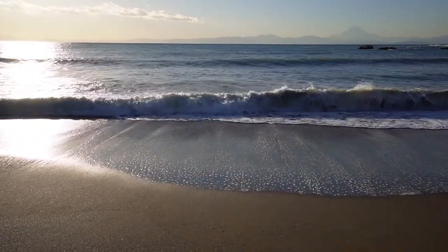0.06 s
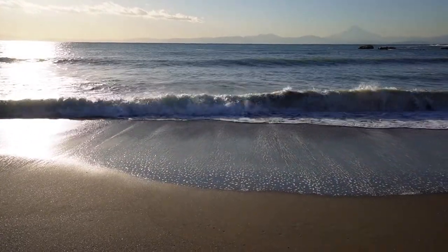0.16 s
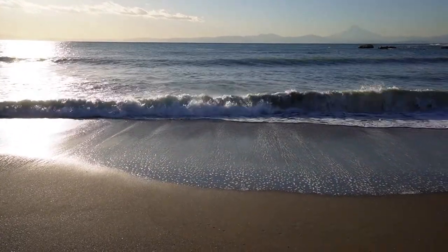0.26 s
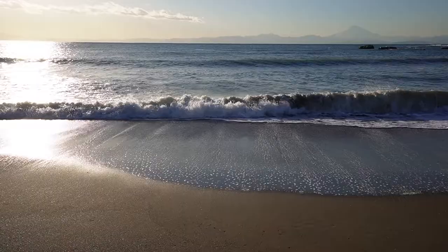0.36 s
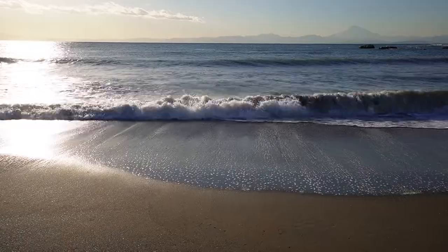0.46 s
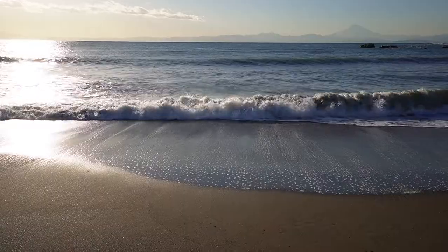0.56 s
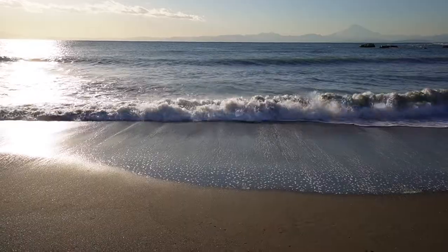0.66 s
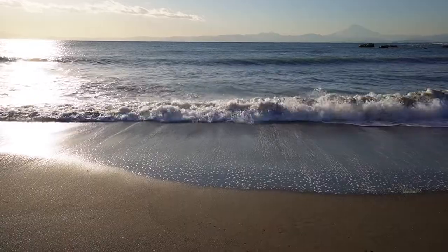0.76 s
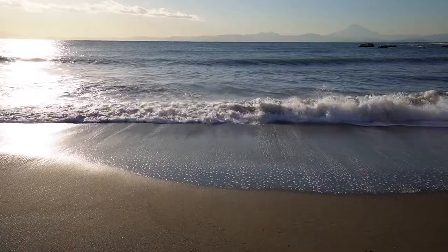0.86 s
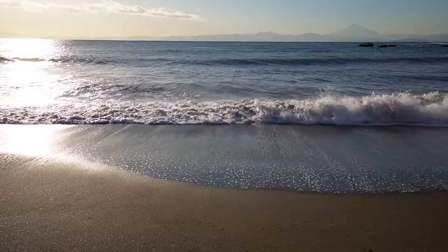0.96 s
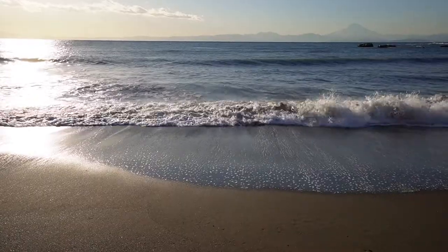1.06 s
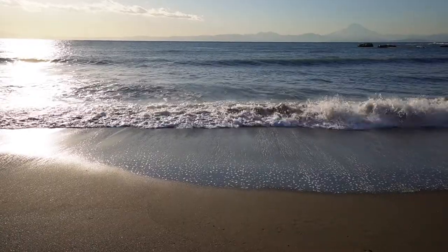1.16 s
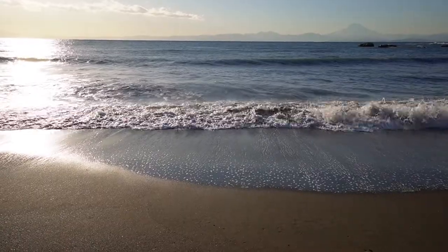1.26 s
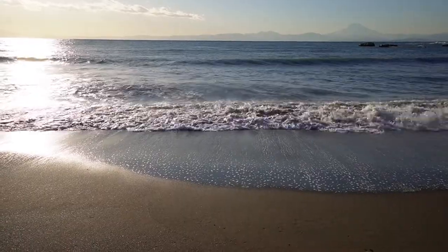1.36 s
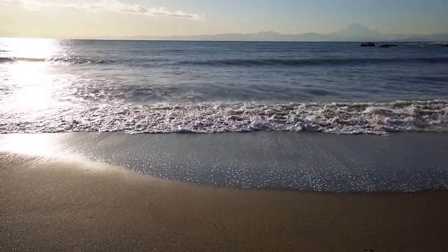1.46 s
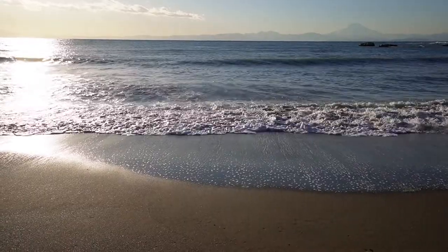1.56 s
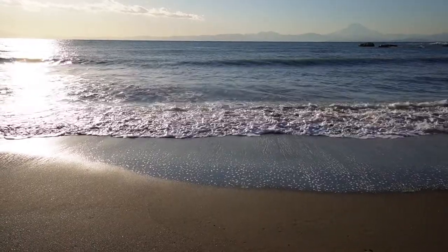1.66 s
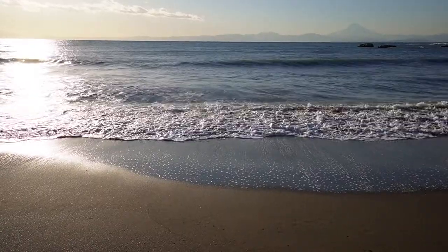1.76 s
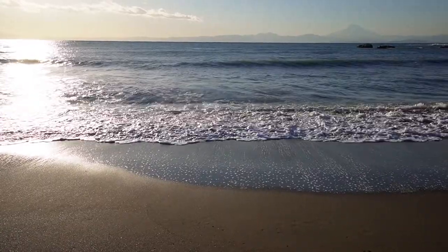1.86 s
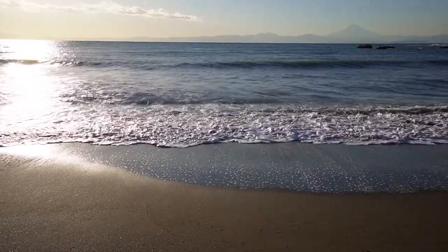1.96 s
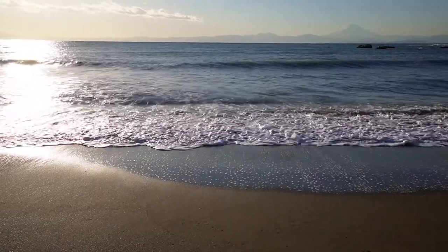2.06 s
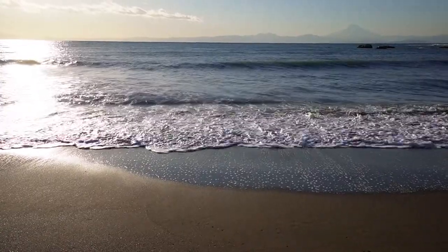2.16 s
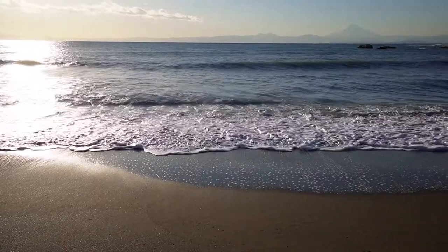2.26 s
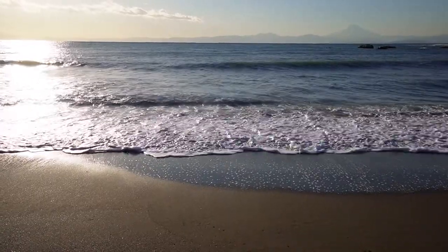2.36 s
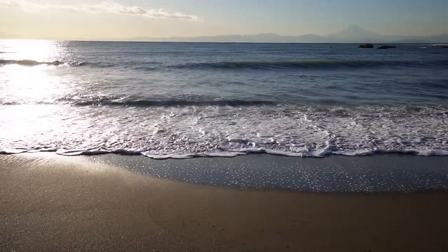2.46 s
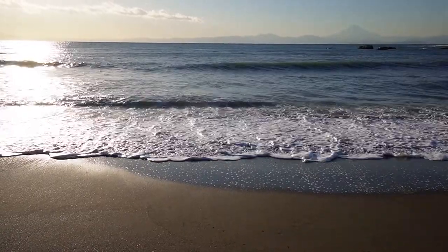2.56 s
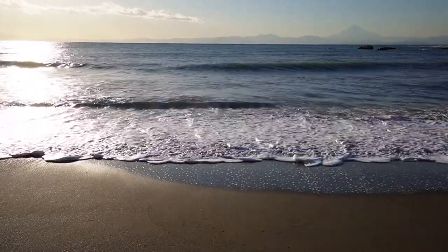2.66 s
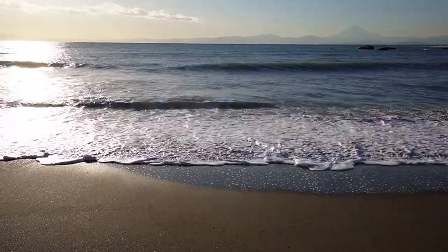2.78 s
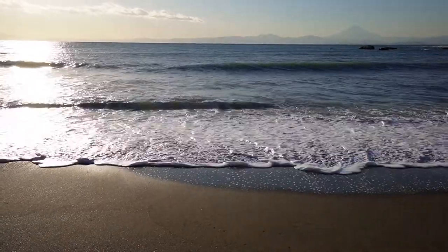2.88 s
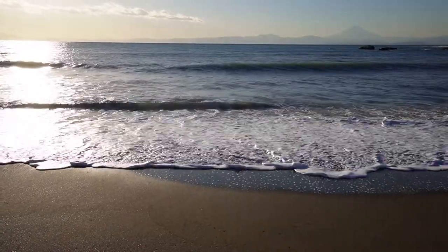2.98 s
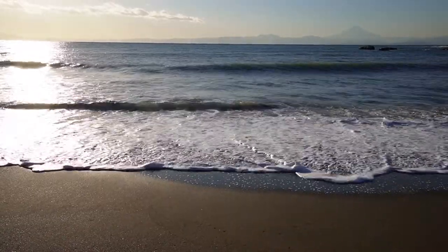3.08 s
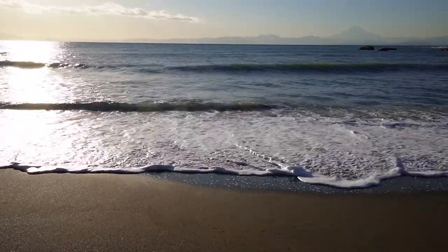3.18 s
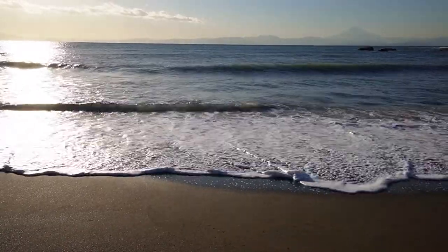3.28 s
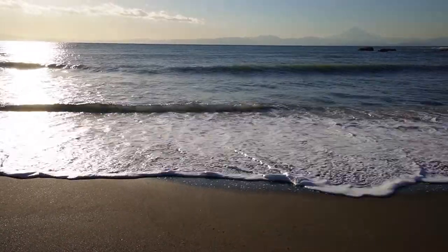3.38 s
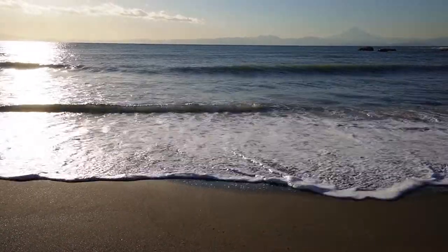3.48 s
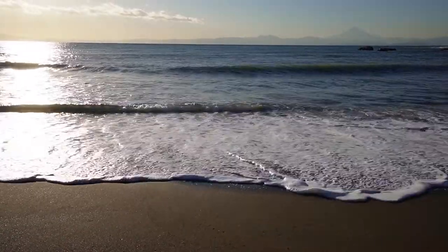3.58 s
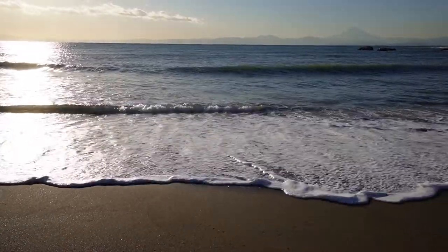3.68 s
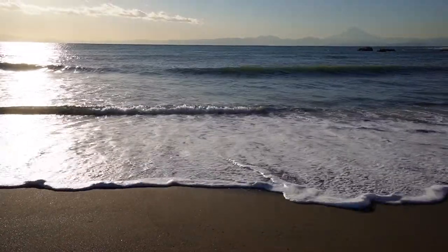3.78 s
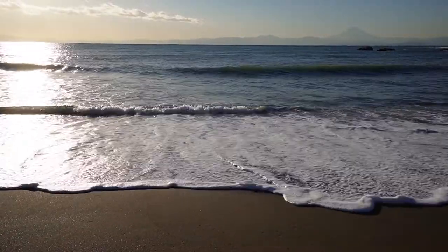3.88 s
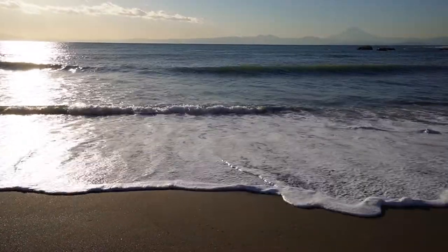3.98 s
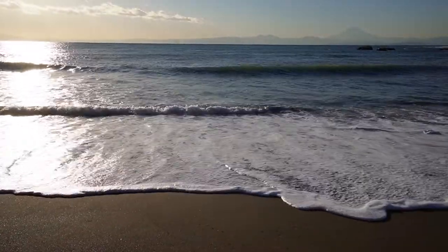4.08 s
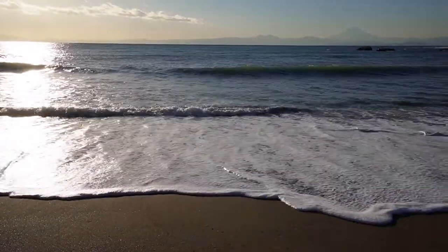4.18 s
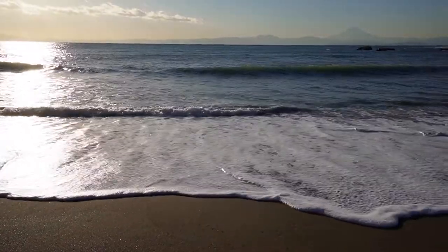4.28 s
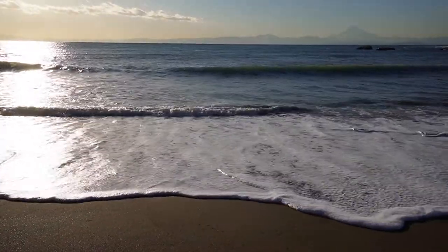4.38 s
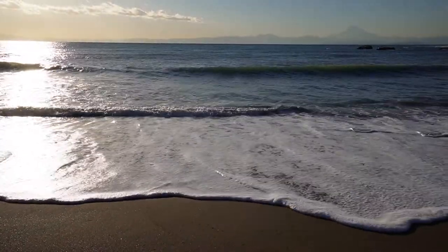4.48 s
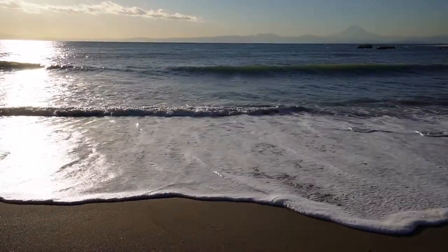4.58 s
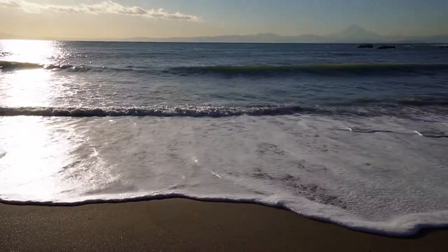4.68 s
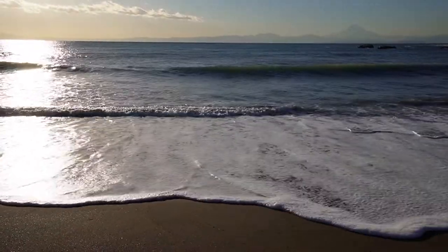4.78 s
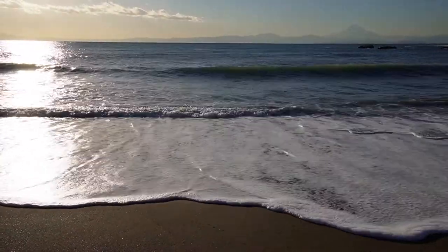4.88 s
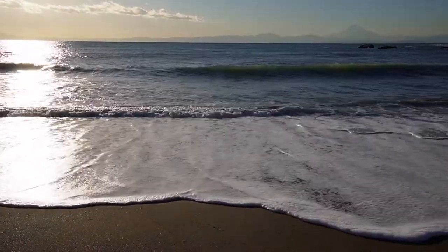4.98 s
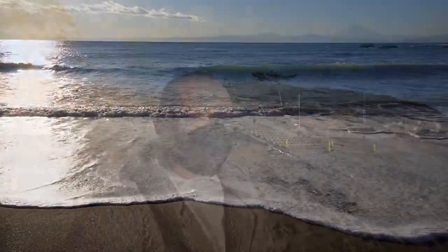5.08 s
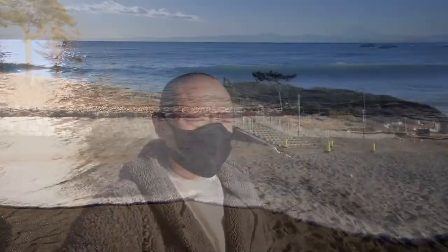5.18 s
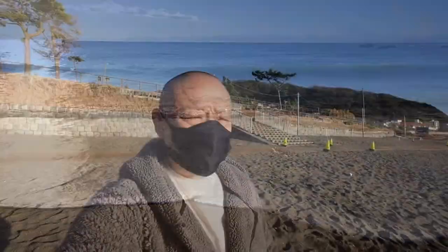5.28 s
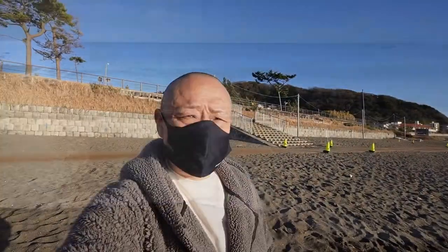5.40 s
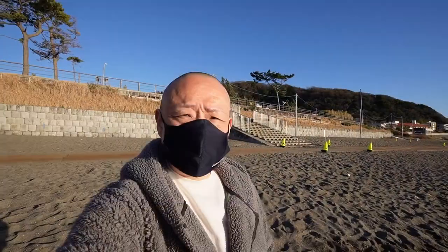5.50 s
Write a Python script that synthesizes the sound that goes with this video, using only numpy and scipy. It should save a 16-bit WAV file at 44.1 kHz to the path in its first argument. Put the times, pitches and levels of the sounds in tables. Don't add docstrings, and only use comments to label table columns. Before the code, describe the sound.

A large wave breaks loudly on a sandy beach, fades into hissing foam, then a smaller wave breaks and washes in.

```python
import sys
import numpy as np
from scipy import signal
from scipy.fft import rfft, irfft, next_fast_len
from scipy.io import wavfile
from scipy.ndimage import uniform_filter1d, map_coordinates

SR = 44100
rng = np.random.default_rng(int(sys.argv[2]) if len(sys.argv) > 2 else 0)


def linear_from_db(decibels):
    return 10 ** (np.asarray(decibels, float) / 20)


def inscribe(sig):
    pcm = np.round(np.clip(np.atleast_2d(sig).T, -1, 1) * 32767)
    wavfile.write(sys.argv[1], SR, pcm.astype(np.int16))


N = 244314
T = np.arange(N) / SR


def unit(x):
    return x / np.sqrt(np.mean(x ** 2) + 1e-20)


def along(points, hz):
    f, value = np.transpose(points)
    return np.interp(np.log(hz + 1), np.log(f + 1), value)


def curves(rows):
    s, *columns = np.transpose(rows)
    return [np.interp(T, s, column) for column in columns]


def wobble(rate):
    return map_coordinates(rng.standard_normal(400), [T * rate])


def lifts(rows):
    total_db = np.zeros(N)
    for s, db, length in rows:
        u = np.clip((T - s) / length + 1, 0, None)
        total_db += db * u * np.exp(1 - u)
    return total_db


def joined(*levels_db):
    return np.sqrt(sum(linear_from_db(2 * db) for db in levels_db))


def filtered(x, response):
    m = next_fast_len(N + 8192)
    return irfft(rfft(x, m) * response(np.fft.rfftfreq(m, 1 / SR)), m)[..., :N]


def rush(spectrum, patchy_db):
    z = signal.stft(rng.standard_normal((2, N)), nperseg=512)[2]
    field = uniform_filter1d(rng.standard_normal(z.shape[1:]), size=8, axis=0)
    field = uniform_filter1d(field, size=12, axis=1)
    pair = signal.istft(z * linear_from_db(patchy_db * unit(field)), nperseg=512)[1][:, :N]
    return unit(filtered(pair, lambda hz: linear_from_db(along(spectrum, hz))))


def bubbles(count, size, centre_hz, spread, cycles, uneven_db):
    draw = rng.random((count, 2))
    hz = centre_hz * np.exp(spread * rng.standard_normal((count, 1)))
    turns = np.clip(hz, 200, 14000) * np.arange(size) / SR
    ring = np.sin(2 * np.pi * turns * (1 + 0.17 * turns / cycles))
    ring *= linear_from_db(-60 * turns / cycles) * (1 - np.exp(-turns))
    rarity = np.minimum(-np.log(draw[:, 1:2]), 3.5)
    ring *= linear_from_db(uneven_db * rarity)
    where = (draw[:, :1] * 2 * N).astype(int) + np.arange(size)
    swarm = np.bincount(where.ravel(), ring.ravel(), 2 * N + size)
    return unit(swarm[:2 * N].reshape(2, N))


# t/s, force level/dB, whiteness/0 plunging crest - 1 tumbling bore, small bubbles/share 0-1
BREAKING_WATER = [(0, -17, -0.14, 0.1), (.14, -16, .05, 0.46), (.35, -15, -0.064, 0.1),
                  (.62, -15.5, 0.21, .23), (.87, -17, 0.19, 0.4), (1.0, -20, 0.93, 0.6),
                  (1.48, -21, 0.86, 0.43), (1.62, -24.5, 0.91, 0.26), (2.05, -32, 1, 0.4),
                  (2.35, -35, 0.25, 0.5), (3.05, -37.5, 0.5, 0.76), (3.44, -35.5, 0.27, 0.7),
                  (3.52, -32, -0.16, 0.94), (3.87, -27, 0.016, 0.32), (4.12, -25.5, -0.11, 0.62),
                  (4.62, -26.5, -0.24, 0.38), (4.9, -26, -0.19, .6), (5.25, -26.5, .1, .4)]


def breaking_water():
    force_db, white, small = curves(BREAKING_WATER)
    return force_db, white, np.clip(small, 0, 1)


# t/s, lift level/dB, length/s
SLAPS = [(0.147, 0.5, 0.049), (.61, 0, 0.017), (1.2, 1, .02), (1.37, 1.5, .05), (1.464, 3, 0.01),
         (3.472, 2.5, 0.016), (3.53, 2.5, .03), (3.6, 1.5, 0.022), (3.72, 3, 0.025), (3.87, 1, .06),
         (4.75, 1.5, 0.016), (5.05, 1, 0.087), (5.2, 2, 0.049), (5.268, 2, 0.023)]


def slaps():
    return lifts(SLAPS)


# f/Hz, level/dB per Hz
LARGE_BUBBLES = [(150, -50), (350, -7), (550, -4), (700, -2), (900, -3), (1150, -6.5), (1800, -14),
                 (2300, -14.5), (4000, -51)]
# f/Hz, level/dB per Hz
SMALL_BUBBLES = [(300, -19), (700, -5.5), (1100, 0), (1500, 1), (1800, 0.5), (2050, -13.5), (2800, -10),
                 (5000, -50)]


def crest_churn(force_db, small, surge, slap_db, out_db, in_db):
    next_db = -34
    gurgle = bubbles(count=9000, size=400, centre_hz=1213, spread=0.362, cycles=16.6, uneven_db=3.5)
    roar = np.sqrt(1 - small) * rush(LARGE_BUBBLES, patchy_db=0.44)
    roar = roar + np.sqrt(small) * rush(SMALL_BUBBLES, patchy_db=0.86)
    gain = joined(force_db + out_db, next_db + in_db) * linear_from_db(0.25 * surge + 0.23 * slap_db)
    compact = linear_from_db([[0], [-2.5]])
    return compact * gain * (roar + linear_from_db(-8) * gurgle)


# f/Hz, level/dB per Hz
AIR_CLOUDS = [(22, -34), (50, -16.5), (100, -7.5), (200, -0.5), (300, -3), (450, -8.5), (800, -22),
              (1500, -58)]
# t/s, lift level/dB
THUDS = [(.2, 1.5), (.76, 5), (.89, 4), (1.03, 1.5), (1.2, 3), (1.32, 2.5), (1.88, 0.5), (2.02, 1.5),
         (2.13, 2), (2.82, 3.5), (3.93, 1), (4.37, 5), (4.54, 3.5), (4.77, -1), (5.0, 0)]


def air_boom(force_db, white, out_db):
    boom_db, white_db, thud_s = -3, 6, 0.03
    thud_db = lifts([(s, db, thud_s) for s, db in THUDS])
    gain = linear_from_db(force_db + boom_db + white_db * white + thud_db + out_db)
    return gain * linear_from_db(0.84 * wobble(12)) * rush(AIR_CLOUDS, patchy_db=-0.3)


# f/Hz, level/dB per Hz
FOAM = [(300, -27), (700, -10.5), (1500, -11), (2000, -2.5), (2900, -2.5), (4200, -5), (6000, -11.5),
        (8500, -25), (13000, -52)]


def foam_fizz(force_db, white, surge, slap_db, out_db, drain_db):
    foam_db, white_db, sheet_db = -4.5, 5.5, -35
    fizz = bubbles(count=30000, size=100, centre_hz=3210, spread=0.28, cycles=7.3, uneven_db=2.5)
    gain = joined(force_db + foam_db + white_db * white + out_db, sheet_db + drain_db)
    return gain * linear_from_db(0.85 * surge + slap_db) * (rush(FOAM, patchy_db=0.14) + linear_from_db(-9.5) * fizz)


# f/Hz, level/dB per Hz
SPRAY = [(3500, -42), (6000, 0), (8000, -2), (10500, -8), (13000, -16.5), (15700, -28)]
# t/s, spray lift level/dB, length/s
MEETING = (3.86, 4.6, .22)


def spray_hiss(force_db, white, surge, slap_db, out_db, in_db, drain_db):
    spray_db, white_db, spray_grows, full_db = -35, 6, 1.27, -16
    sheet_db, spray_drains = -46.3, 1.4
    next_db, next_dims = -44, 0.3
    thrown_db = spray_db + spray_grows * (force_db - full_db) + white_db * white + out_db
    sheet_db = sheet_db + lifts([MEETING]) + spray_drains * drain_db
    gain = joined(thrown_db, sheet_db, next_db + in_db + next_dims * out_db)
    gain = gain * linear_from_db(1.8 * surge + 0.6 * slap_db + 0.49 * wobble(4.6))
    return gain * rush(SPRAY, patchy_db=-1.1)


# f/Hz, level/dB per Hz
FAR = [(25, -9), (60, -12), (130, 10.5), (220, -16), (350, -3), (500, -14), (900, -10), (2500, -11.5),
       (6000, -40)]


def distant_surf(since_fade_s):
    level = linear_from_db([[-42], [-39]] + 1.2 * wobble(3))
    return level * linear_from_db(-15 * since_fade_s) * rush(FAR, patchy_db=-0.5)


def surf():
    force_db, white, small = breaking_water()
    slap_db = slaps()
    surge = 0.39 * wobble(9.8) + 0.18 * wobble(14)
    since_fade_s = np.clip(T - 5.263, 0, None)
    out_db = -41.5 * since_fade_s
    in_db = 20 * np.log10(1.001 - linear_from_db(out_db))
    drain_db = out_db - 3 * np.clip(T - 4.44, 0, None)
    churn = crest_churn(force_db, small, surge, slap_db, out_db, in_db)
    boom = air_boom(force_db, white, out_db)
    foam = foam_fizz(force_db, white, surge, slap_db, out_db, drain_db)
    spray = spray_hiss(force_db, white, surge, slap_db, out_db, in_db, drain_db)
    return churn + boom + foam + spray + distant_surf(since_fade_s)


# t/s, place along the shore/0 ahead - 1 right
CREST = [
    (.2, 0.061),
    (.6, .4),
    (1.3, .74),
    (1.8, .85),
    (3.1, .4),
    (3.45, .45),
    (4.0, .12),
    (4.9, .03),
    (5.54, .7),
]
# f/Hz, level/dB
WIDTH = [(60, -42), (220, -26), (370, -26), (550, -15.5), (1100, -13.5), (1500, -14), (2100, -19),
         (3000, -13.5), (4200, -19), (6000, -11), (8200, -9.5), (10700, -5), (13500, 2.5)]
# f/Hz, phase/rad
TWIST = [(100, 0.016), (220, 0.069), (370, 0.082), (550, 0.19), (1100, 0.051), (2100, 0.24), (4200, 0.25),
         (8200, 0.15), (13500, .28)]
# f/Hz, share/0-1
SHADE = [(200, 0.0049), (550, 0.16), (800, 0.12), (1500, 0.19), (3000, 0.22), (6000, 0.15), (8200, 0.17),
         (12000, 0.017)]


def scene():
    port_lag_s = 14e-6
    place, = curves(CREST)
    shared, apart = surf()
    side = filtered(apart, lambda hz: linear_from_db(along(WIDTH, hz)))
    side = side + filtered(shared, lambda hz: 1j * along(TWIST, hz))
    side = side - place * filtered(shared, lambda hz: along(SHADE, hz) + 1j * np.pi * hz * port_lag_s)
    return np.array([shared + side, shared - side])


def low_pass(x):
    return signal.sosfilt(signal.butter(12, 15690, fs=SR, output="sos"), x)


def record(dry):
    cut = filtered(dry, lambda hz: 1j * hz / (20 + 1j * hz))
    soft = cut / (1 + np.abs(cut / 0.95) ** 5) ** (1 / 5)
    return low_pass(soft)


dry = scene()
out = record(dry)
inscribe(out)
```